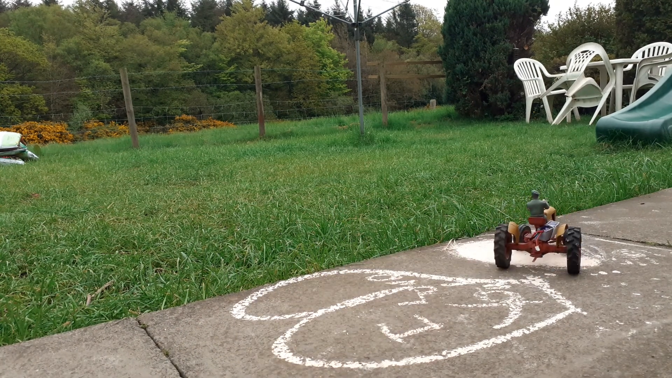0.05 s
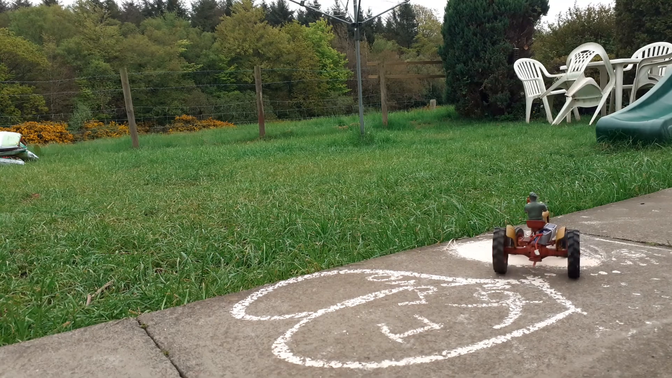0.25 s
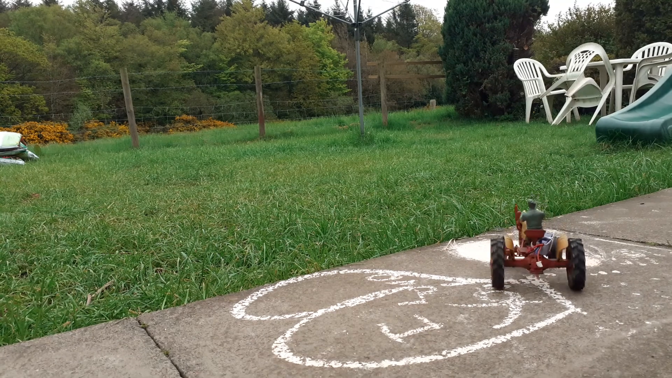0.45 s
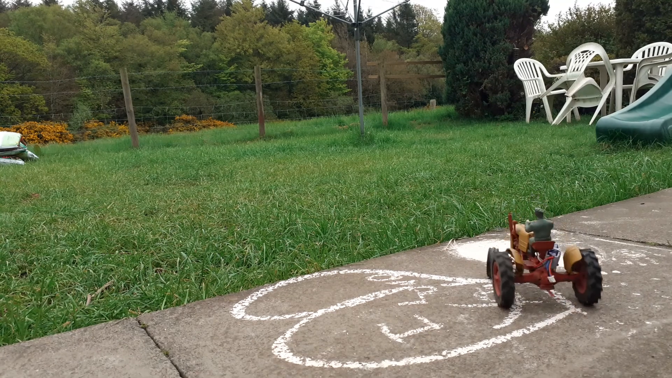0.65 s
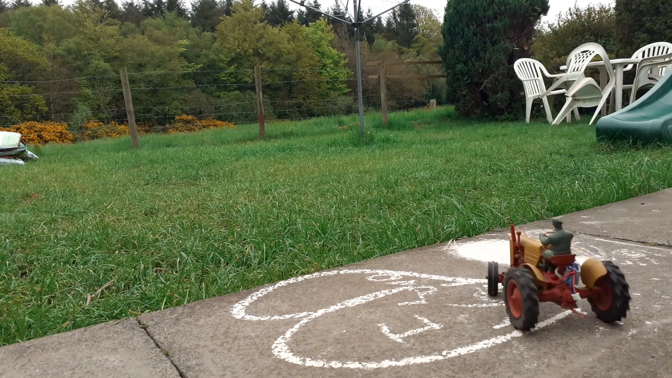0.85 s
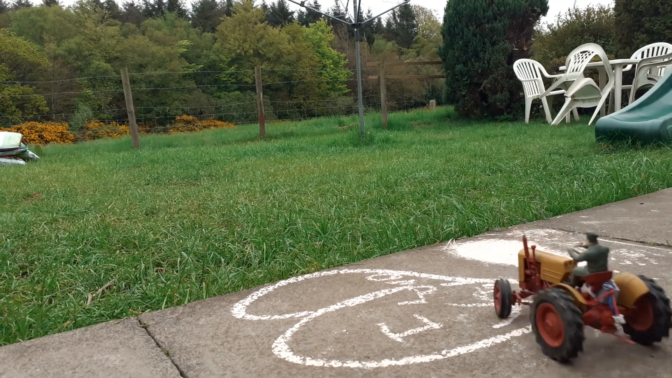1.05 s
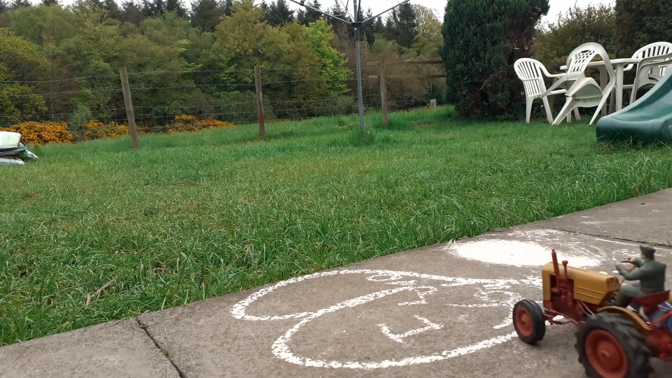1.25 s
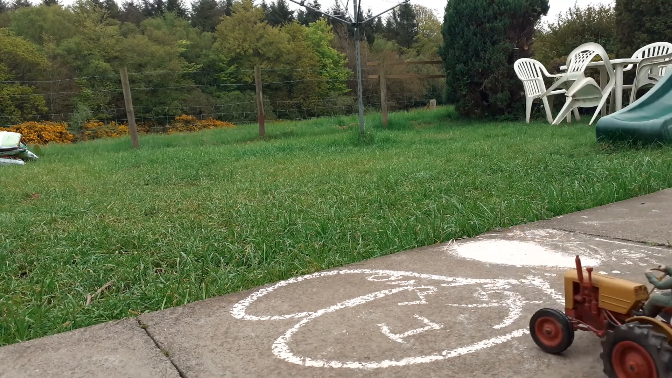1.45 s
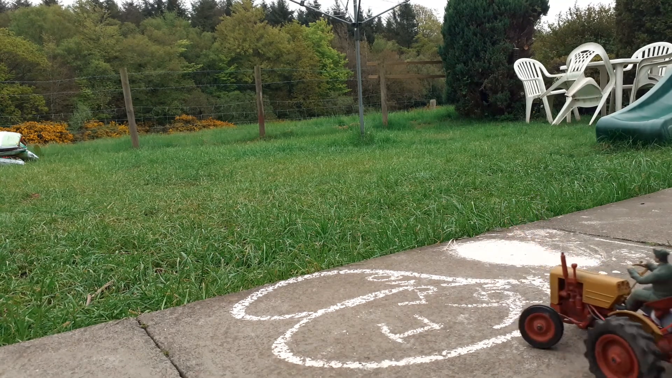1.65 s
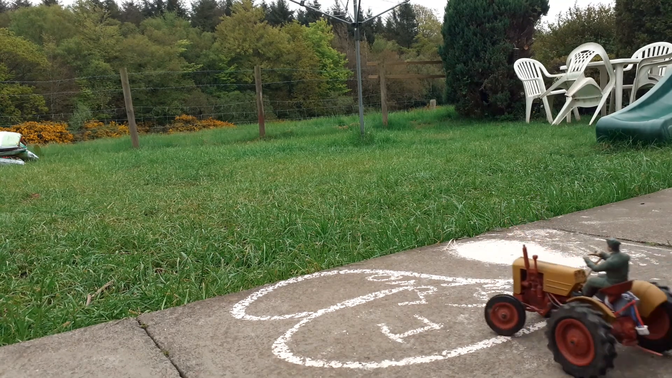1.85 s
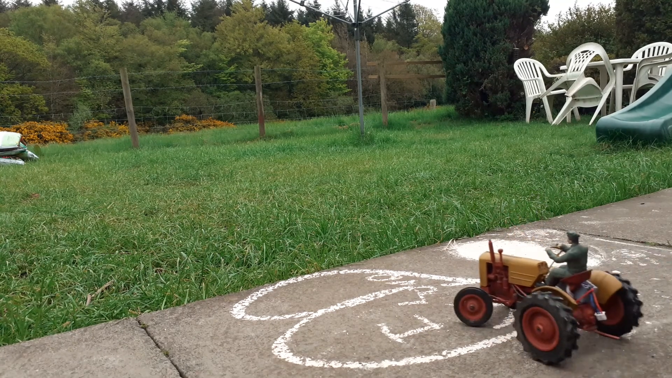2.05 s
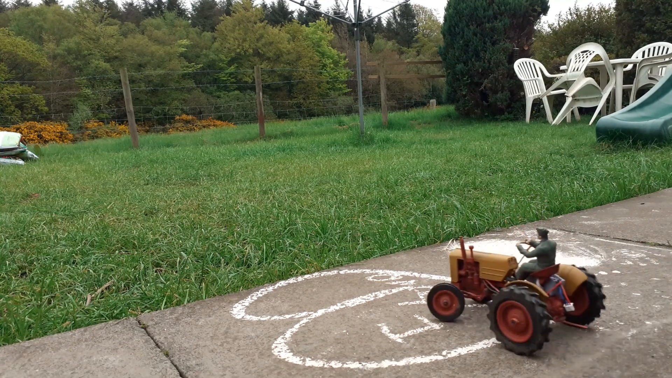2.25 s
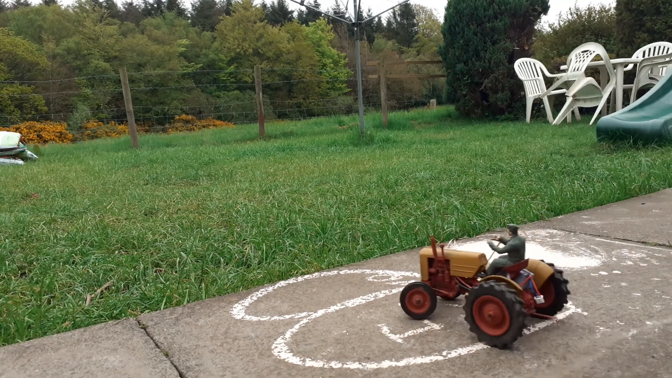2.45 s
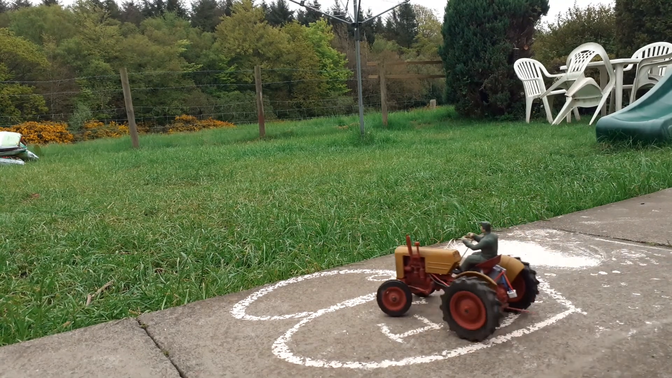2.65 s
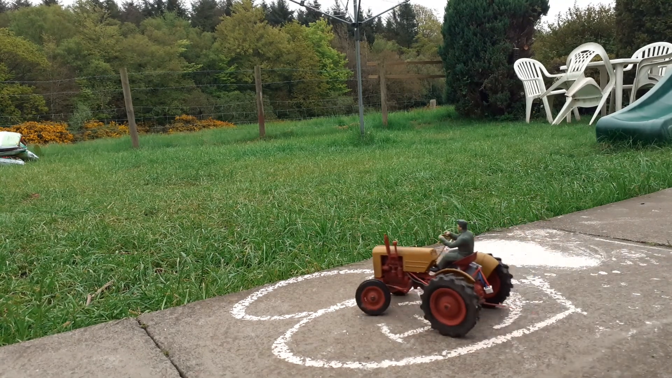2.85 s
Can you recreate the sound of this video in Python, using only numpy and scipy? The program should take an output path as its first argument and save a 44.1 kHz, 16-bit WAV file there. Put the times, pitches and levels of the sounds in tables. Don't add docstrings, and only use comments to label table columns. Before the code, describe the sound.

A model tractor's gear hiss cuts out almost at once, and a faint servo hum rises around 0.2 s. From 0.3 to 1.2 s backing gears whine loudly, high and wavering, with bright stuttering hiss and tiny knocks. They fade to a lull near 1.5 s. From 1.6 s a lower, softer forward whine joins dense tyre grit cracks, thinning after 2.1 s, over light wind and faint traffic drone.

```python
import sys
import numpy as np
from scipy import signal
from scipy.fft import rfft, irfft
from scipy.io import wavfile
from scipy.ndimage import uniform_filter1d, map_coordinates

SR = 44100
rng = np.random.default_rng(int(sys.argv[2]) if len(sys.argv) > 2 else 0)


def output_pcm(signal):
    pcm = np.clip(np.atleast_2d(signal).T, -1, 1) * 32767
    wavfile.write(sys.argv[1], SR, np.round(pcm).astype(np.int16))


def gain_from_db(level_db):
    decades = np.asarray(level_db, float) / 20
    return 10 ** decades


N = 130095

# time in seconds, level in dB.
EFFORT = [(0, -39), (.015, -54), (.03, -63.5), (.165, -65), (.185, -49), (.3, -39), (.7, -37),
          (1.05, -36.5), (1.16, -32.5), (1.21, -41.5), (1.38, -44.5), (1.5, -50), (1.6, -48), (1.68, -43.5),
          (1.85, -41), (2.05, -44.5), (2.4, -45), (2.95, -52)]
# start in seconds, depth of slack in dB,
# tooth rate after it in Hz, glide in Hz per second, whine strength in dB.
BACK_BITES = [(.16, -2, 1478, 2495.5, -32), (0.284, -0.5, 1820, 1218, -7), (.34, 2, 1865, 1115.5, 1.5),
              (.418, 2.5, 2120, -1600, -0.5), (0.496, 4.5, 2122, -2200, -2), (0.554, 3, 2042, -2300, -0.5),
              (.59, 3.5, 2078, -3600, -9), (.62, -0.5, 1956, -1200, 4.5), (.672, 2.5, 2060, -3500, -6),
              (.7, -2.5, 1953, 1817.5, 0.5), (.77, -1.5, 2142, -1500, 0), (0.823, -1.5, 2047, 2994, -5),
              (.852, 0, 1924, 799, 0.5), (0.879, 2, 2128, 2477, -3.5), (.91, 0, 2210, -4000, 4.5),
              (.938, 5.5, 2312, -1500, 2), (.99, -1.5, 2102, -400, 2), (1.056, -2, 2136, -7000, 7),
              (1.077, 3.5, 2066, 655, -5), (1.11, 7, 2137, -6000, 0), (1.159, 4, 1840, -700, -14),
              (1.19, 1.5, 1798, 1498, -32), (1.236, 3, 1850, 1797, -5), (1.285, -1.5, 1890, 100.5, -21)]
# start in seconds, depth of slack in dB, tooth rate in Hz,
# glide in Hz per second, whine strength in dB.
AHEAD_BITES = [(1.51, 6, 1290, -400, -3), (1.6, 0, 1250, 650, 1), (1.677, 1, 1130, 3700, 1),
               (1.762, 1, 1215, 8300, 2), (1.808, 0, 1570, -1800, 2), (1.84, 1, 1350, 3500, -1),
               (1.88, 1, 1320, 5000, -2), (1.902, 0, 1355, -1300, 2), (1.978, 2, 1250, 1000, -14),
               (2.005, 6, 1300, 3500, -4), (2.022, 0, 1600, -500, 0), (2.058, 0, 1280, -2000, 0),
               (2.11, 0, 1185, 2200, 0), (2.188, 1, 1265, 1900, 1), (2.232, 0, 1245, 3900, 0),
               (2.282, 0, 1330, -2000, 1), (2.328, 0, 1250, 2600, 0), (2.36, 0, 1280, -500, -10),
               (2.39, 4, 1255, 300, 2), (2.445, 0, 1260, 100, -10), (2.49, 2, 1280, -500, 1),
               (2.525, 0, 1200, -100, -5), (2.7, 0, 1290, -300, -4), (2.8, 0, 1200, -100, -6)]
# multiple of the tooth rate, level in dB re hiss.
BACK_ORDERS = [(2, -8), (3, -2.5), (4, 1), (6, 0)]
AHEAD_ORDERS = [(3, -5.5), (4, -2.5), (5, -7)]
# centre backing in Hz, centre forward in Hz,
# half width in Hz, most loss in dB.
CASING = (5900, 5100, 1100, 12)
# frequency in Hz, density in dB per Hz.
BACK_HISS = [(2800, -23.5), (4600, -17), (5600, -7.5), (7000, -12), (8000, -12), (9400, -16.5),
             (11500, -8.5), (16000, -3.5)]
AHEAD_HISS = [(2800, -21), (4200, -12), (5200, -8.5), (7000, -12), (8900, -13.5), (10500, -11),
              (13500, -9.5), (16000, -13.5)]
# time in seconds, centre in Hz,
# level in dB re hiss.
HOUSING = [(0, 11940, -6), (.45, 12500, -13), (.75, 13270, -9.5), (1.1, 12150, -5), (1.3, 12010, -31),
           (1.6, 11770, 0), (2.3, 11600, -3), (2.45, 11240, -5.5), (2.95, 10930, -6)]
# time in seconds, centre in Hz,
# level in dB re hiss.
AXLE = [(0, 5500, -38), (.5, 5500, -10.5), (1.15, 5500, -23), (1.25, 6820, -7.5), (1.5, 6860, -3.5),
        (1.6, 6960, -20), (2.95, 6900, -9)]
# time in seconds, peak in dB.
KNOCKS = [(.277, -30), (.527, -30), (1.117, -26), (1.125, -28)]
# time in seconds, lag of the left in samples, left minus right in dB.
BEARING = [(0, 6.35, 2), (.6, 6.12, 0.5), (1.3, 8.76, 2), (1.65, 7.54, -3), (2, 6.75, 1), (2.95, 3.85, 3.5)]
# time in seconds, level in dB.
ROLL = [
    (0, -88),
    (.2, -65.5),
    (1.05, -55.5),
    (1.25, -63.5),
    (1.58, -68),
    (1.64, -56.5),
    (1.92, -54.5),
    (2.2, -57),
    (2.95, -61),
]
# frequency in Hz, density in dB per Hz.
ROLL_COLOUR = [(200, -8.5), (350, -0.5), (1000, 2), (2000, 5), (3000, 0.5), (4200, -49)]
# time in seconds, peak in dB.
GRIT = [(0.438, -40), (0.978, -42), (1.068, -45), (1.166, -52), (1.517, -44), (1.61, -39), (1.627, -39),
        (1.638, -41), (1.665, -36), (1.709, -35), (1.78, -33), (1.83, -45.5), (1.849, -30), (1.884, -32.5),
        (1.914, -34.5), (1.931, -36.5), (1.962, -35.5), (1.988, -31.5), (2.012, -33), (2.06, -46),
        (2.074, -42), (2.095, -32.5), (2.248, -42), (2.325, -51), (2.355, -50), (2.365, -39.5),
        (2.383, -39), (2.405, -46), (2.478, -37.5), (2.506, -43), (2.532, -45), (2.656, -47),
        (2.693, -40.5), (2.836, -64.5), (2.858, -50), (2.865, -43), (2.896, -43.5)]
# time in seconds, peak in dB.
STONES = [(2.478, -26), (2.096, -32), (1.851, -31), (1.831, -33), (1.991, -33), (2.013, -35), (1.885, -35),
          (2.364, -39), (2.658, -38), (1.638, -35), (2.857, -42), (2.897, -43)]
# start in seconds, length in seconds, pitch in Hz,
# glide in Hz per second, level in dB.
SERVO = [
    (.165, .15, 1450, 1, -63),
    (.16, .14, 1530, 2300, -60),
    (.29, .055, 1860, -1500, -57),
    (.8, .2, 2040, 1200, -60),
    (1.49, .11, 1560, 1, -62),
]
# time in seconds, level in dB.
WIND = [(0, -91), (1.1, -67), (1.75, -92), (1.82, -58), (1.93, -67), (2, -73), (2.1, -55.5), (2.38, -77),
        (2.48, -63.5), (2.95, -69.5)]
# frequency in Hz, density in dB per Hz.
WIND_COLOUR = [(33, -48), (42, -5), (75, 6), (130, -7.5), (220, -11)]
# frequency in Hz, density in dB per Hz.
GARDEN = [(100, -8.5), (300, -14.5), (700, -20.5), (2300, -22.5), (3200, -24.5), (5500, -14.5), (9400, -29),
          (16000, -27)]
# peak time in seconds, half length in seconds, height in dB.
DRONE_SWELL = (1.0, 0.26, 6.5)

TURN_S = 1.5
SLACK_S, BITE_S, BITE_DB = 0.013, 0.005, 7
WHINE_WOBBLE, WHINE_FLUTTER_DB = 0.011, 1.6
WHINE_ROUGH, WHINE_ROUGH_HZ = 0.4, 240
HOUSING_WIDTH_HZ, AXLE_WIDTH_HZ, KNOCK_HZ = 550, 320, 8000
HISS_SPREAD = 0.8
SHADOW, SHADOW_HZ = 0.55, 6860
GRIT_T60_S, GRIT_SNAP_DB = 0.012, -3
FINE_GRIT_PER_S, FINE_GRIT_DB = 220, 6
CRUNCH_DB, CRUNCH_S = -8.5, 0.006
WIND_LEFT_DB, WIND_SHARED = 2.7, 0.8
GARDEN_DB = -62.5
DRONE_HZ, DRONE_WIDTH_HZ, DRONE_DB = 274.5, 53, -67.5
CUTOFF_HZ = 15760


def rms_one(x):
    return x / np.sqrt(np.mean(x ** 2) + 1e-20)


def in_time(rows):
    s, *columns = np.transpose(rows)
    return [np.interp(np.arange(N) / SR, s, c) for c in columns]


def drift(rate):
    r = np.exp(-2 * np.pi * rate / SR)
    slow = signal.lfilter([1], [1, -2 * r, r * r], rng.standard_normal(N + SR))
    return rms_one(slow[SR:])


def coloured(spectrum, patchy_db, channels, rate=7.1):
    hz = np.fft.rfftfreq(N, 1 / SR) + 1
    at, db = np.transpose(spectrum)
    gain = gain_from_db(np.interp(np.log(hz), np.log(at), db, -90, -90))
    bins = rfft(rng.standard_normal((channels, N))) * gain
    band = (3 * np.log2(hz)).astype(int)
    kept = np.unique(band[(hz >= at[0]) & (hz <= at[-1])])
    return rms_one(sum(gain_from_db(patchy_db * drift(rate)) * irfft(bins * (band == k), N) for k in kept))


def ring(clicks, hz, t60):
    r, w = gain_from_db(-60 / (t60 * SR)), 2 * np.pi * hz / SR
    return signal.lfilter([0, np.sin(w)], [1, -2 * r * np.cos(w), r * r], clicks + 1e-18)


def clicks_at(rows):
    clicks = np.zeros(N)
    for s, db in rows:
        clicks[int(s * SR)] = gain_from_db(db)
    return clicks


def moving_band(rows, width_hz):
    centre_hz, peak_db = in_time(rows)
    lowpass = signal.butter(2, width_hz, fs=SR, output="sos")
    slow = signal.sosfilt(lowpass, rng.standard_normal((2, 3, N)))
    swing = 2 * np.pi * np.cumsum(centre_hz) / SR
    return gain_from_db(peak_db) * rms_one(slow[0] * np.cos(swing) + slow[1] * np.sin(swing))


def placed(x, spread=0, share=1.):
    lag, db = in_time(BEARING)
    late = map_coordinates(x, [np.arange(N) - lag], order=3)
    left, right = (np.array([late, x]) + spread) * gain_from_db(np.array([db, -db]) * share / 2)
    hz = np.fft.rfftfreq(N, 1 / SR) + 1
    shadow = 1 - SHADOW / (1 + (SHADOW_HZ / hz) ** 4)
    return np.array([irfft(rfft(left) * shadow, N), right])


def tooth_whine(rate, load_db, ahead):
    turns = 2 * np.pi * np.cumsum(rate * (1 + WHINE_WOBBLE * drift(61.0))) / SR
    back_hz, ahead_hz, half_width_hz, most_loss_db = CASING
    favoured_hz = back_hz + (ahead_hz - back_hz) * ahead
    whine = 0
    for orders, share in (BACK_ORDERS, 1 - ahead), (AHEAD_ORDERS, ahead):
        for k, order_db in orders:
            loss_db = np.minimum(6 * ((k * rate - favoured_hz) / half_width_hz) ** 2, most_loss_db)
            level = gain_from_db(order_db - loss_db + load_db + 0.85 * drift(52.0))
            in_phase = (1 + WHINE_ROUGH * drift(WHINE_ROUGH_HZ)) * np.sin(k * turns)
            skirt = WHINE_ROUGH * drift(WHINE_ROUGH_HZ) * np.cos(k * turns)
            whine = whine + share * level * (in_phase + skirt)
    return whine


def gear_hiss(ahead):
    hiss = (1 - ahead) * coloured(BACK_HISS, 1.5, channels=3)
    hiss = hiss + ahead * coloured(AHEAD_HISS, 1.5, channels=3)
    hiss = hiss + moving_band(HOUSING, HOUSING_WIDTH_HZ) + moving_band(AXLE, AXLE_WIDTH_HZ)
    return hiss * gain_from_db(1.2 * drift(25.0) + 1.0 * drift(250.0) - 1.5)


def gears():
    t = np.arange(N) / SR
    s, depth_db, hz, glide, strength_db = np.transpose(BACK_BITES + AHEAD_BITES)
    now = np.clip(np.searchsorted(s, t) - 1, 0, None)
    rate = uniform_filter1d(hz[now] + glide[now] * np.clip(t - s[now], 0, None), size=150)
    slack_db = sum(d * np.exp(-((t - at) / SLACK_S) ** 2) for at, d in zip(s, depth_db))
    level = gain_from_db(in_time(EFFORT)[0] - slack_db)
    load_db = uniform_filter1d(strength_db[now], size=400) + WHINE_FLUTTER_DB * drift(27.0)
    load_db -= sum(BITE_DB * np.exp(-((t - at) / BITE_S) ** 2) for at in s)
    ahead = uniform_filter1d((t > TURN_S) * 1., size=2000)
    whine = level * tooth_whine(rate, load_db, ahead)
    hiss = level * gear_hiss(ahead)
    knocks = ring(clicks_at(KNOCKS), KNOCK_HZ, 0.0024)
    return placed(whine + knocks + hiss[0], HISS_SPREAD * hiss[1:])


def fine_grit(roll_db):
    born = rng.random(N) < FINE_GRIT_PER_S * gain_from_db(5.0 * drift(25.0)) / SR
    size_db = roll_db + 4.0 * np.minimum(rng.exponential(1, N), 3)
    grains = gain_from_db(size_db) * rng.choice([-1, 1], N) * born
    mode = rng.integers(0, 10, N)
    modes_hz = np.geomspace(600, 4500, 10)
    rung = sum(ring(grains * (mode == k), hz, 1.4 / hz) for k, hz in enumerate(modes_hz))
    return gain_from_db(FINE_GRIT_DB) * rung


def grit_cracks():
    cracks, crunch, after = np.zeros(N), np.zeros(N), np.arange(900)
    for (s, db), (low, mid, high) in zip(GRIT, rng.random((len(GRIT), 3))):
        click = gain_from_db(db - 5.5) * (after == 0)
        body = ring(click, 1600 + 900 * mid, GRIT_T60_S)
        snap = ring(click, 900 + 500 * low, .008) - ring(click, 2600 + 1400 * high, .008)
        cracks[int(s * SR):][:900] += body + gain_from_db(GRIT_SNAP_DB) * snap
        crunch[int(s * SR):][:900] += gain_from_db(db + CRUNCH_DB) * np.exp(-after / SR / CRUNCH_S)
    return cracks + crunch * coloured(ROLL_COLOUR, 0.11, channels=1)[0]


def tyres():
    roll_db, = in_time(ROLL)
    roll = gain_from_db(roll_db) * coloured(ROLL_COLOUR, 1.3, channels=3)
    grit = fine_grit(roll_db) + grit_cracks()
    stones = ring(clicks_at(STONES), 4000, .0014)
    return placed(grit + roll[0], .9 * roll[1:], share=-.2) + stones


def servo():
    t = np.arange(N) / SR
    shake = np.cumsum(drift(30.0)) / SR * 5.0
    hums = np.zeros(N)
    for s, length, hz, glide, db in SERVO:
        edges = np.clip(np.minimum(t - s, s + length - t) / 0.018, 0, 1)
        cycles = hz * (t - s) + glide * (t - s) ** 2 / 2 + shake
        hums += gain_from_db(db) * edges * np.sin(2 * np.pi * cycles)
    return placed(hums, share=.3)


def wind():
    gust = gain_from_db(in_time(WIND)[0]) * coloured(WIND_COLOUR, 1.0, channels=3, rate=14.0)
    return (WIND_SHARED * gust[0] + 1.06 * gust[1:]) * gain_from_db([[WIND_LEFT_DB], [-WIND_LEFT_DB]])


def garden():
    murmur = gain_from_db(GARDEN_DB) * coloured(GARDEN, 0.58, channels=3)
    wide = gain_from_db([[1.0], [-1.0]]) * 0.66 * murmur[0] + 0.83 * murmur[1:]
    peak_s, half_s, height_db = DRONE_SWELL
    swell_db = height_db * np.exp(-((np.arange(N) / SR - peak_s) / half_s) ** 2)
    drone = rms_one(ring(rng.standard_normal(N), DRONE_HZ, 2.05 / DRONE_WIDTH_HZ))
    drone = gain_from_db(DRONE_DB + swell_db + 1.7 * drift(5.8)) * drone
    return wide + drone * gain_from_db([[1.5], [-1.5]])


def scene():
    return gears() + tyres() + servo() + wind() + garden()


def roll_off(x):
    return signal.sosfilt(signal.butter(12, 16730, fs=SR, output="sos"), x)


def record(dry):
    passed = np.fft.rfftfreq(N, 1 / SR) < CUTOFF_HZ
    mix = irfft(rfft(dry) * passed, N)
    return roll_off(mix)


dry = scene()
out = record(dry)
output_pcm(out)
```